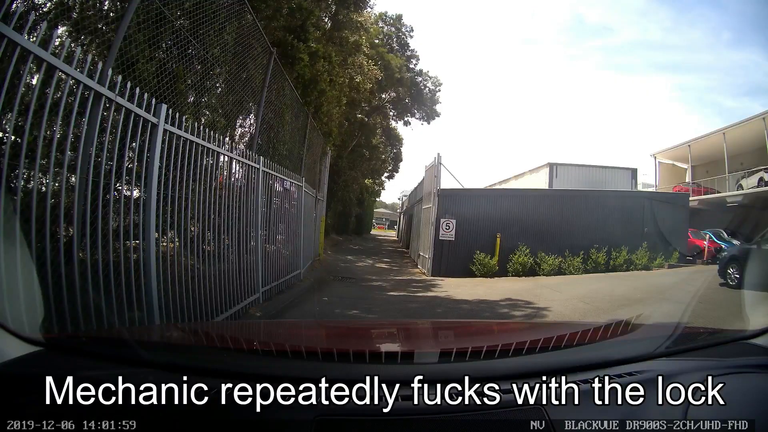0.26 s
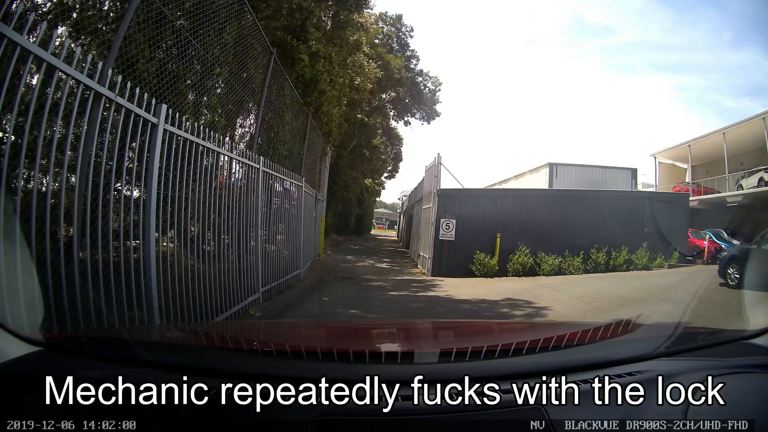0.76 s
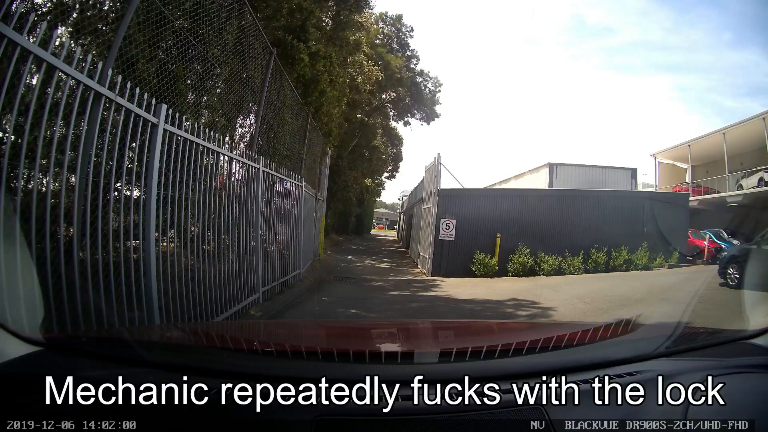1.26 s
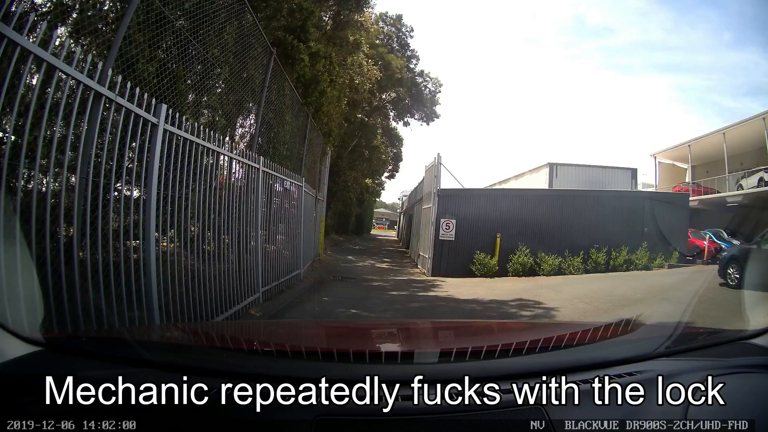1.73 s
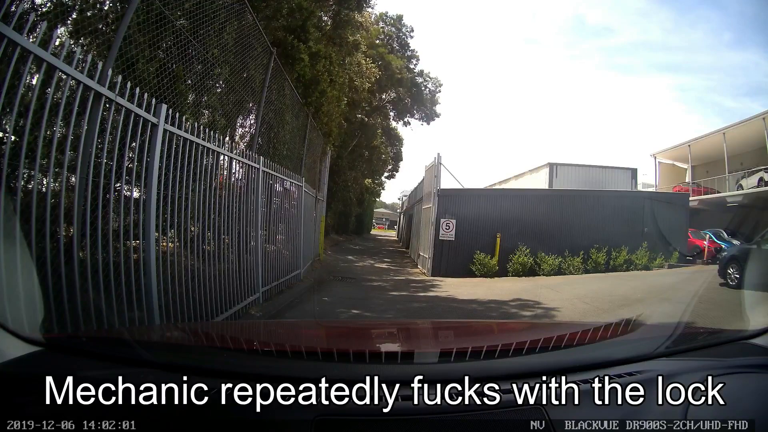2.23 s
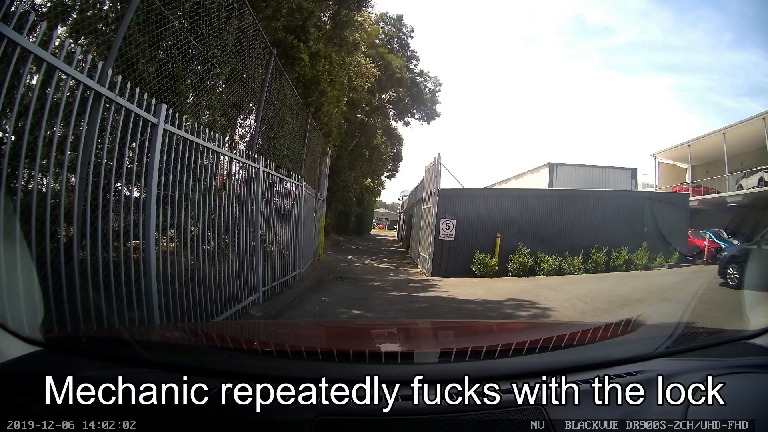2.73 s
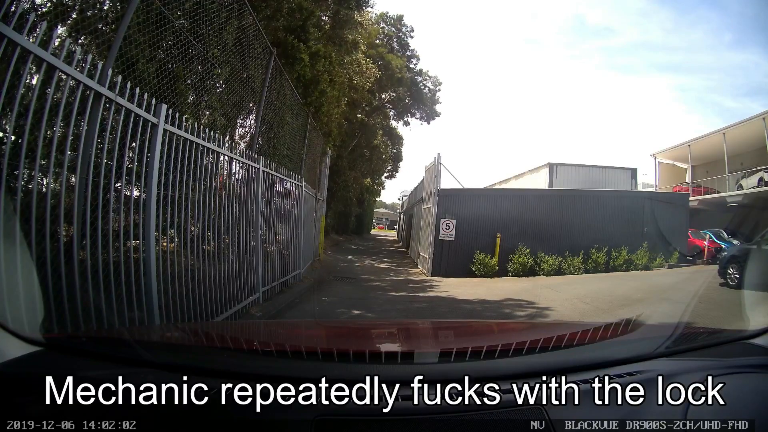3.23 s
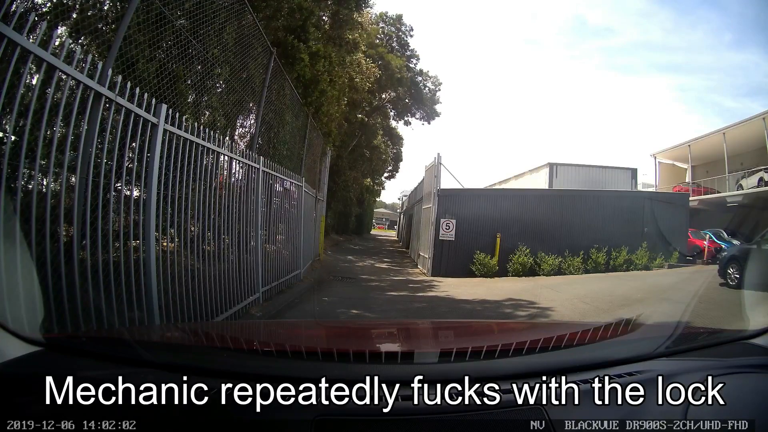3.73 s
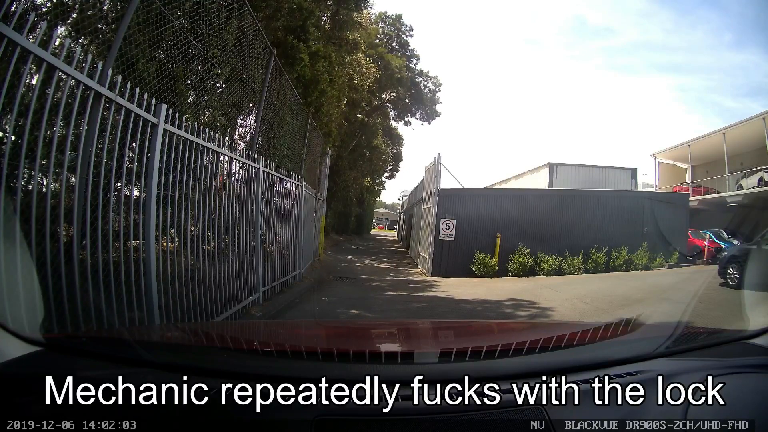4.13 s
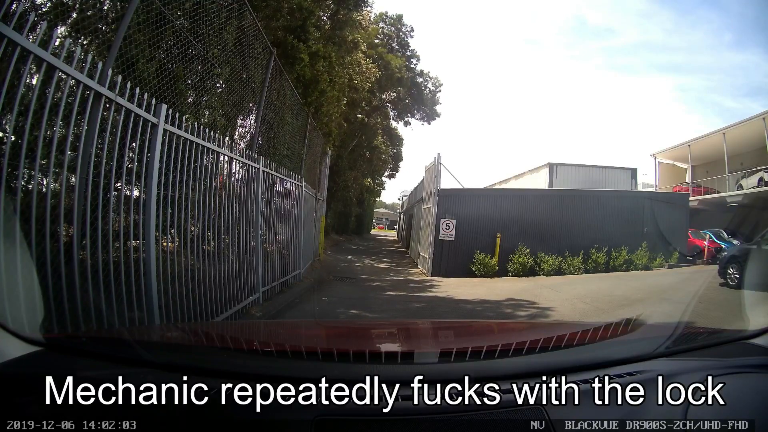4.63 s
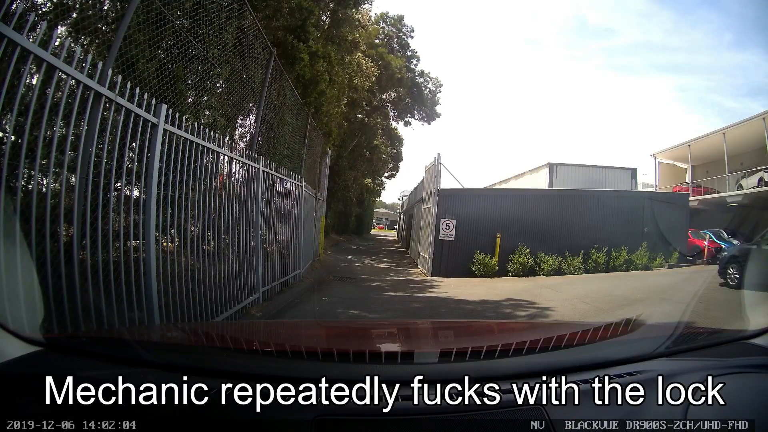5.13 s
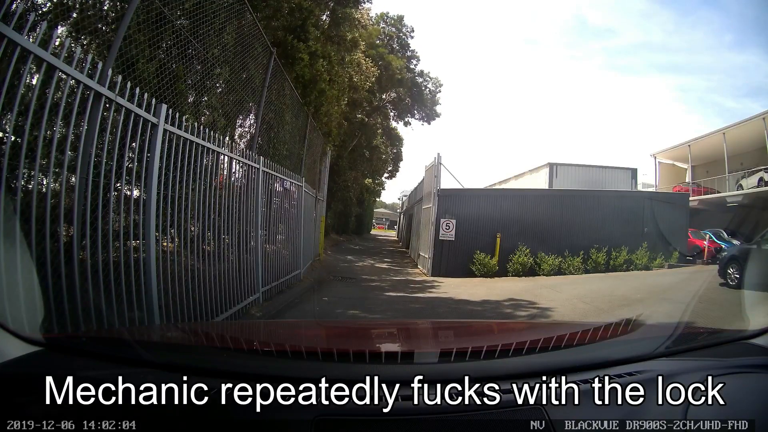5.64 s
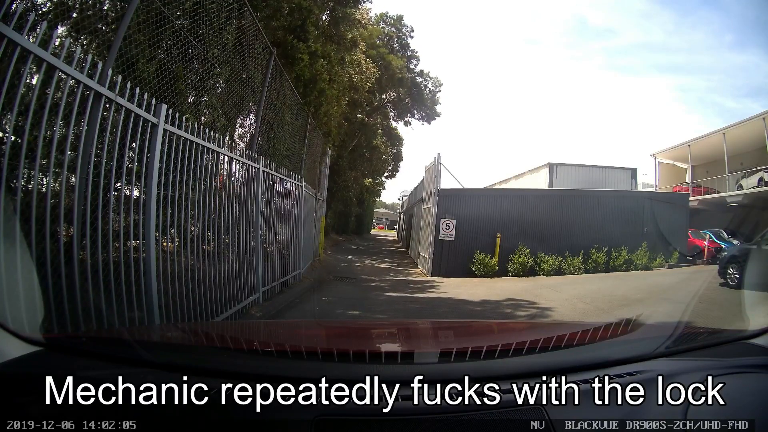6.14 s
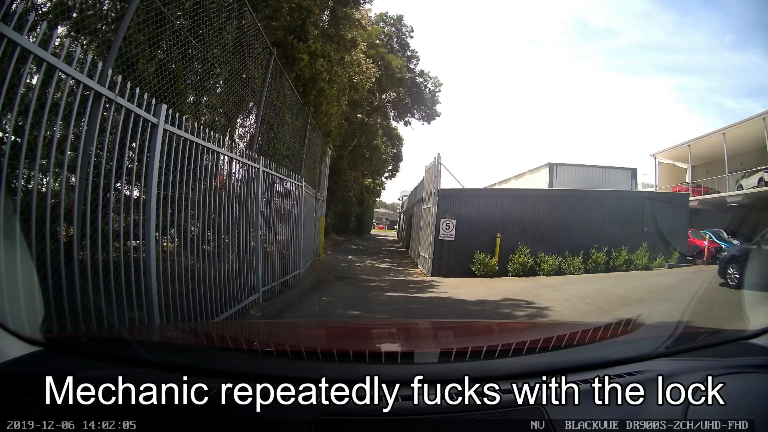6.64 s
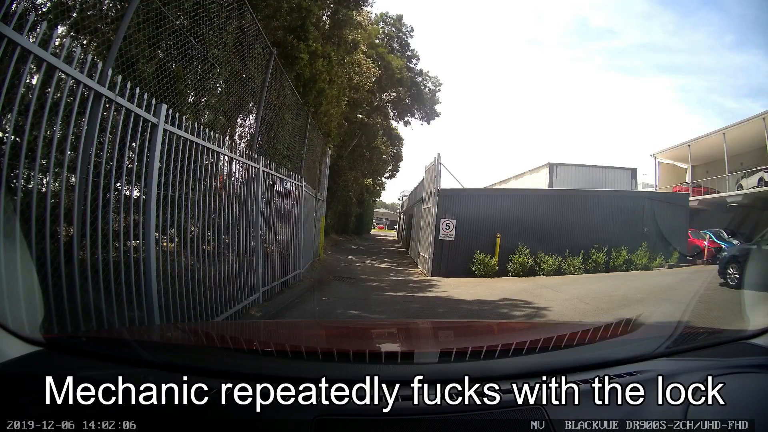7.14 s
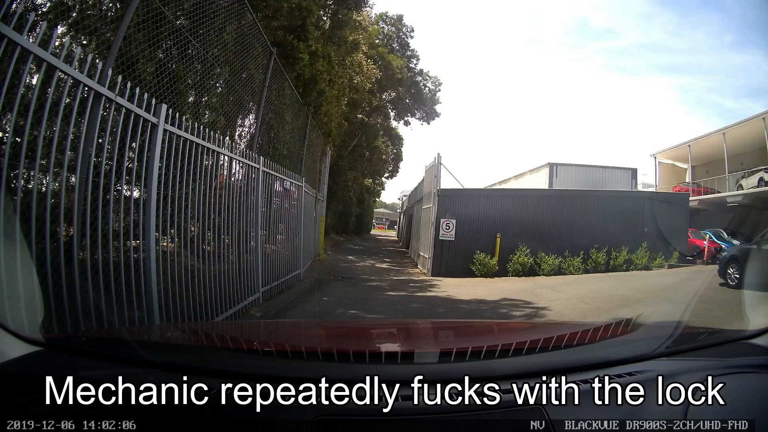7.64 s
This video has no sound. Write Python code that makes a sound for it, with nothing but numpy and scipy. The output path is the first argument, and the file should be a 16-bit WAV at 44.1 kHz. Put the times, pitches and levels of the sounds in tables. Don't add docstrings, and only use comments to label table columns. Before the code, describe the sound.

Inside a quiet parked car, central door locks clunk hard again and again, each stroke followed by a softer, duller return knock and tiny relay ticks.

```python
import sys
import numpy as np
from scipy import signal
from scipy.fft import rfft, irfft, next_fast_len
from scipy.io import wavfile
from scipy.ndimage import map_coordinates

SR = 44100
rng = np.random.default_rng(int(sys.argv[2]) if len(sys.argv) > 2 else 0)


def dump_mix(stems):
    frames = np.atleast_2d(stems).T
    limited = np.clip(frames, -1, 1)
    pcm = np.round(limited * 32767).astype(np.int16)
    wavfile.write(sys.argv[1], SR, pcm)


def ratio_of_db(decibels):
    return 10 ** (np.asarray(decibels, float) / 20)


N = 347949

# start in seconds, travel to the stop
# in seconds, jerk level in dB, slam level in dB, grinding level in dB.
LOCKING = [
    (1.749, 0.052, -29.5, -21.5, -29),
    (2.601, .058, -26.5, -23.5, -35.5),
    (3.961, .059, -24.5, -23, -36.5),
    (5.95, .058, -25.5, -22, -34),
    (6.74, .059, -24.5, -21.5, -35.5),
]
UNLOCKING = [
    (3.208, .053, -51, -26.5, -37),
    (7.445, .054, -57, -24, -36.5),
]
RETURNING = [
    (2.141, .055, -57, -43.5, -49.5),
    (3.0, 0.049, -56, -44, -51),
    (3.61, 0.052, -56.5, -46.5, -51),
    (3.925, .008, -59, -66, -65),
    (4.355, 0.054, -52.5, -45, -51.5),
    (4.66, 0.017, -61, -64, -69),
    (6.344, .053, -57, -47, -54.5),
    (7.14, 0.051, -54.5, -46.5, -53.5),
    (7.839, 0.047, -54, -42.5, -51),
]
# time in seconds, peak level in dB, then the panel, casing
# and spring levels in dB against that peak.
STRAGGLERS = [
    (1.764, -28.5, -32, -7, -30.5),
    (1.806, -35.5, -8, -2, -28),
    (1.815, -27.5, -10, -18, -40),
    (1.833, -40, 3, -7, -38),
    (3.279, -31.5, -10.5, -13, -47),
    (7.486, -36.5, -31, -9, -55),
]
# delay in seconds, level in dB.
DOOR_REBOUNDS = [
    (-.005, -5.5),
    (0, 6),
    (.0028, -1.5),
    (.0057, -0.5),
    (.013, -2),
    (0.02, -12.5),
]

# pitch in Hz, level in dB, time to fade by 60 dB in seconds.
BODY = [(63.7, -4.5, 0.15), (75.8, -10, 0.2), (91.5, -2, 0.22), (106.4, -7.5, 0.18)]
PANEL = [(115.9, -5.5, 0.2), (135.8, 9, 0.079), (160.2, 1, 0.086), (179, -4.5, 0.11), (196.7, 0.5, 0.12)]
TRIM = [(218, -4, 0.11), (259.6, -7.5, 0.05), (293.8, 4, 0.057), (373, -13.5, 0.039), (387.4, -1, 0.023),
        (470, -11.5, 0.047), (527, -1, 0.078), (584, 1, 0.035), (673, 0, 0.035), (408, 11.5, 0.013)]
LATCH = [(728, -4.5, 0.038), (847, -11.5, 0.065), (859, -7, 0.047), (970, -4, 0.0066), (1001, -0.5, 0.052),
         (1100, -8.5, 0.037), (1180, -1, 0.043), (1221, -0.5, 0.03), (1350, -1, 0.05), (1490, -7, 0.024),
         (1540, -12.5, 0.046), (1034, 8.5, 0.0052)]
CASING = [(1852, 14, 0.01), (2017, 2.5, 0.09), (2096, 7, 0.013), (2600, -12.5, 0.0043), (2737, -9.5, 0.041),
          (2954, -11.5, 0.038), (3150, -5, 0.015), (3700, -14, 0.0073)]
SPRING = [(3460, -1.5, 0.0033), (4310, 5, 0.008), (4900, 7.5, 0.0045), (5530, -1, 0.036), (5900, 2, 0.012),
          (6400, -4, 0.0075), (6940, -9, .005)]
FAR_DOOR = [(341, -10, 0.043), (450, -10.5, 0.036), (574, -3.5, 0.12), (641, -3, 0.11), (734, -1, 0.017),
            (880, 2, 0.015), (2000, -13, 0.036)]

# panel, trim, casing, spring and body levels in dB.
JERK = (-6.5, -6, -23, -51.5, -22)
LOCK_SLAM = (-4.5, -7, -20.5, -50, -4.5)
UNLOCK_SLAM = (-4, -8, -21.5, -49, -6.5)
STRAGGLER_TRIM_DB = -8
RETURN_JERK, RETURN_SLAM = (1.5, -2.2), (-6.5, -5)

# start in dB against the level at the stop, settling in dB per second, panel level in dB,
# panel gain in dB per second while settling, trim level in dB.
LOCK_GRIND = (-2, 240, 5, 132.5, 5.5)
UNLOCK_GRIND = (-14, 225, 2.5, 161, 6.5)
RETURN_GRIND = (-4, 94, 8.5, 41, -0.5)
# start and end pitch in Hz, start and end level in dB against the grinding.
LOCK_WHINE = (1650, 2258, -33.5, -17.5)
UNLOCK_WHINE = (1030, 1264, -13, -3)
RETURN_WHINE = (1178.5, 1125, -8.5, -17.5)
KINDS = [(LOCKING, LOCK_GRIND, LOCK_WHINE),
         (UNLOCKING, UNLOCK_GRIND, UNLOCK_WHINE),
         (RETURNING, RETURN_GRIND, RETURN_WHINE)]
# delay in seconds, overrun past the stop in seconds.
MOTOR_RUNS = [
    (.012, 0),
    (.001, 0),
    (.003, .09),
]

# time in seconds, peak level in dB.
RELAY_SHUT = [
    (2.4981, -42),
    (6.6964, -43.5),
]
RELAY_OPEN = [
    (2.1571, -41.5),
    (2.8368, -43.5),
    (3.6275, -44.5),
    (4.2971, -42),
    (6.3569, -42.5),
    (7.0359, -46),
    (7.8264, -44),
]
# delay in seconds, level in dB.
RELAY_CHATTER = [
    (0, 0.5),
    (.0035, 6),
    (.008, -23),
    (0.022, -25),
]
# pitch in Hz, level in dB, time to fade by 60 dB in seconds.
COIL_SHUT = [(1080, -5.5, 0.022), (1373, -6.5, 0.031), (1766, 0.5, 0.028), (2000, -0.5, 0.028),
             (2250, -11, .03), (2880, -12.5, 0.025)]
COIL_OPEN = [(1100, -4, 0.03), (1232, -5, 0.024), (1340, -1.5, 0.022), (1828, -3.5, 0.045),
             (2110, -2.5, 0.013), (2815, -16, 0.025)]

# time in seconds, pitch in Hz, level in dB.
BIRD = [(3.62, 4900, -77), (3.70, 4900, -72), (3.755, 4900, -74), (3.84, 4900, -74), (3.885, 4900, -74),
        (3.93, 4900, -73)]
# pitch in Hz, level in dB per Hz.
HUM = [(12, -36), (20, -10.5), (48, -3), (110, -6.5), (145, 0), (175, -3.5), (220, -7.5), (330, -12),
       (510, -15.5), (830, -20.5), (3000, -28), (5000, -30.5), (7000, -32.5), (8200, -48)]


def unit(x):
    return x / np.sqrt(np.mean(x ** 2) + 1e-20)


def wobble(rate):
    knots = rng.standard_normal(int(N * rate / SR) + 4)
    return map_coordinates(knots, [np.arange(N) * rate / SR])


def ring(modes, times, db, scatter_db, contact, swell, both_ways=False):
    at = np.clip(np.round(times * SR).astype(int), 0, N - 1)
    chance = rng.standard_normal((len(at), len(modes)))
    db = np.where(times * SR < N - 2, db, -150)
    first = at[db > -140].min()
    push = signal.windows.hann(max(3, int(contact * SR)))
    sign = np.sign(rng.standard_normal(chance.shape)) if both_ways else np.ones(chance.shape)
    out = np.zeros(N)
    for k, (hz, level_db, t60) in enumerate(modes):
        strength = ratio_of_db(db + level_db + scatter_db * chance[:, k])
        knocks = np.bincount(at, sign[:, k] * strength, N)
        t60 = min(t60, .026 + 24 / hz)
        fade = 1000 ** (-1 / (t60 * SR))
        turn = 2 * np.pi * hz / SR
        lag = np.exp(-hz / (swell * SR))
        gain = abs((1 - lag) * (1 - lag * np.exp(-2j * turn)))
        ringing = [0, np.sin(turn), 0, 1, -2 * fade * np.cos(turn), fade ** 2]
        swelling = [gain, 0, 0, 1, -2 * lag * np.cos(turn), lag ** 2]
        out[first:] -= (-1) ** k * signal.sosfilt([ringing, swelling], knocks[first:])
    return np.convolve(out, push / push.sum())[:N]


def rebounds(s, pattern, jitter):
    lag, rebound_db = np.transpose(pattern)
    times = s[:, None] + lag + jitter * rng.standard_normal((len(s), len(lag)))

    def each(db):
        return np.repeat(db, len(lag)) + np.tile(rebound_db, len(s))

    return times.ravel(), each


def contacts(strokes, jerk, slam):
    rows = []
    for s, travel, jerk_db, slam_db, _ in strokes:
        rows.append((s, jerk_db, *jerk))
        rows.append((s + travel, slam_db, *slam))
    return rows


def blows():
    late = [(s, db, panel_db, STRAGGLER_TRIM_DB, casing_db, spring_db, panel_db)
            for s, db, panel_db, casing_db, spring_db in STRAGGLERS]
    return contacts(LOCKING, JERK, LOCK_SLAM) + contacts(UNLOCKING, JERK, UNLOCK_SLAM) + late


def latches():
    s, db, panel_db, trim_db, casing_db, spring_db, body_db = np.transpose(blows())
    times, each = rebounds(s, DOOR_REBOUNDS, jitter=.0003)
    return (ring(BODY, times, each(db + body_db - 12.5), scatter_db=1.5, contact=.006, swell=3.5)
            + ring(PANEL, times, each(db + panel_db - 9), scatter_db=2.5, contact=.0026, swell=.91)
            + ring(TRIM, times, each(db + trim_db - 11), scatter_db=5, contact=.00096, swell=.38)
            + ring(LATCH, times, each(db - 11.5), scatter_db=3, contact=.00059, swell=.19)
            + ring(CASING, times, each(db + casing_db - 10), scatter_db=4.5, contact=.00019, swell=1)
            + ring(SPRING, times, each(db + spring_db), scatter_db=6, contact=.00007, swell=3.5,
                   both_ways=True))


def far_latch():
    s, db, panel_db, latch_db = np.transpose(contacts(RETURNING, RETURN_JERK, RETURN_SLAM))
    times, each = rebounds(s, DOOR_REBOUNDS, jitter=.00035)
    return (ring(BODY, times, each(db + panel_db - 3.5), scatter_db=2, contact=.0043, swell=2.8)
            + ring(PANEL, times, each(db + panel_db - 8.5), scatter_db=2.5, contact=.001, swell=1.9)
            + ring(FAR_DOOR, times, each(db - 6.5), scatter_db=2.5, contact=.00058, swell=.6)
            + ring(LATCH[4:], times, each(db + latch_db - 9), scatter_db=4.5, contact=.00078, swell=.39))


def grinding():
    rise_s, settle_s = .008, .16
    body_waits_db = -21
    strokes = []
    for rows, (start_db, settle_db, panel_db, gain_db, trim_db), _ in KINDS:
        for s, travel, _, _, db in rows:
            stop = s + travel
            settled_db = db - settle_db * settle_s
            late_panel_db = panel_db + gain_db * settle_s
            strokes.append([(s - rise_s, db - 22.5, panel_db, trim_db, body_waits_db),
                            (s, db + start_db, panel_db, trim_db, body_waits_db),
                            (stop, db, panel_db, trim_db, 0),
                            (stop + settle_s, settled_db, late_panel_db, trim_db, 0)])
    return sorted(strokes)


def gears():
    # ringing part, level in dB, contact in seconds
    parts = [(LATCH, -28, .0006), (PANEL, -39, .003), (TRIM, -33, .0012),
             (CASING, -43, .0002), (SPRING, -66, .00007), (BODY, -37, .004)]
    draws = rng.random((round(N / SR * 1500), 2))
    times = (np.arange(len(draws)) + draws[:, 0]) / len(draws) * N / SR
    level = np.full((len(parts), len(times)), -150.)
    for rows in grinding():
        s, db, panel_db, trim_db, body_db = np.transpose(rows)
        during = (times > s[0]) & (times < s[-1])
        curves = (db, db + panel_db, db + trim_db, db, db, db + panel_db + body_db)
        level[:, during] = [np.interp(times[during], s, curve) for curve in curves]
    size_db = -3 * np.log(draws[:, 1] + .03) - 3
    out = np.zeros(N)
    for (modes, part_db, contact), db in zip(parts, level):
        out += ring(modes, times, db + part_db + size_db, scatter_db=8.5, contact=contact, swell=.41,
                    both_ways=True)
    return out


def whines():
    rows = []
    for (strokes, _, (hz0, hz1, db0, db1)), (delay, overrun) in zip(KINDS, MOTOR_RUNS):
        for s, travel, _, _, db in strokes:
            end = min(s + travel + overrun, N / SR)
            rows.append((s + delay, end, hz0, hz1, db + db0, db + db1))
    return rows


def motors():
    out = np.zeros(N)
    rough = ratio_of_db(3 * wobble(400)) * np.exp(1j * 1.2 * wobble(300))
    for start, end, hz0, hz1, db0, db1 in whines():
        span = np.arange(round(start * SR), int(end * SR) - 1)
        u = np.linspace(0, 1, len(span))
        cycles = np.cumsum(hz0 + (hz1 - hz0) * u) / SR
        edges = np.minimum(1, 8 * np.minimum(u, 1 - u))
        tone = np.real(rough[span] * np.exp(2j * np.pi * cycles))
        out[span] += ratio_of_db(db0 + (db1 - db0) * u) * edges * tone
    return out


def relay():
    out = np.zeros(N)
    for events, coil in ((RELAY_SHUT, COIL_SHUT), (RELAY_OPEN, COIL_OPEN)):
        s, db = np.transpose(events)
        times, each = rebounds(s, RELAY_CHATTER, jitter=.0002)
        out += ring(coil, times, each(db - 9), scatter_db=4, contact=.00011, swell=.78)
    return out


def cabin(x):
    t = np.arange(SR // 5) / SR
    dull = signal.lfilter([1], [1, -.6], rng.standard_normal(len(t)))
    tail = dull * ratio_of_db(-60 * t / .13) * (t > .002)
    return x + ratio_of_db(-10.5) * signal.fftconvolve(x, tail / np.linalg.norm(tail))[:N]


def bird():
    out = np.zeros(N)
    half = SR // 20
    t = np.arange(-half, half) / SR
    for s, hz, db in BIRD:
        cheep = np.exp(-(t / .01) ** 2) * np.sin(2 * np.pi * hz * t)
        out[round(s * SR) - half:][:len(t)] += ratio_of_db(db - 1) * cheep
    return out


def hum():
    m = next_fast_len(N + 8192)
    hz = np.fft.rfftfreq(m, 1 / SR)
    f, db = np.transpose(HUM)
    colour = ratio_of_db(np.interp(np.log(hz + 1), np.log(f + 1), db))
    noise = rfft(rng.standard_normal(m)) * colour
    low = 1 / (1 + (hz / 450) ** 2)
    rumble = irfft(noise * low, m)[:N]
    hiss = irfft(noise * (1 - low), m)[:N]
    rumble = rumble * ratio_of_db(.33 * wobble(2.98) + 1.2 * wobble(19))
    hiss = hiss * ratio_of_db(.27 * wobble(5.2))
    return ratio_of_db(-61) * unit(rumble + hiss)


def scene():
    inside = latches() + far_latch() + gears() + motors() + relay()
    return (cabin(inside) + bird() + hum())[None]


def band_limit(x):
    return signal.sosfilt(signal.butter(12, 15650, fs=SR, output="sos"), x)


def record(dry):
    camera_rate = 16000
    load = signal.lfilter([1 / 3000], [1, 1 / 3000 - 1], np.abs(dry[0])) ** .45
    hiss = signal.lfilter([1, 0, 0, -1], [1], rng.standard_normal(N)) / 2
    noisy = dry[0] + ratio_of_db(-47.5) * load * hiss
    bass_cut = signal.butter(2, 45, "high", fs=SR, output="sos")
    noisy = signal.sosfilt(bass_cut, noisy)
    slow = signal.resample_poly(noisy, 160, 441, padtype="line")
    joined = np.interp(np.arange(N) / SR, np.arange(len(slow)) / camera_rate, slow)
    return band_limit(joined[None])


dry = scene()
out = record(dry)
dump_mix(out)
```